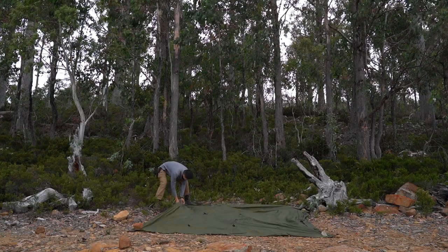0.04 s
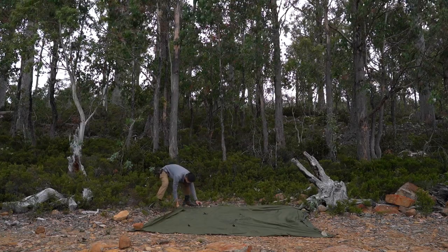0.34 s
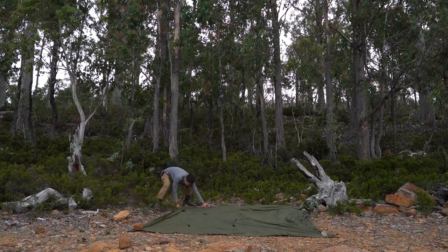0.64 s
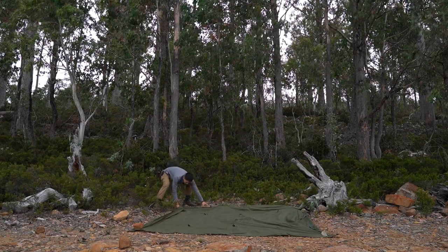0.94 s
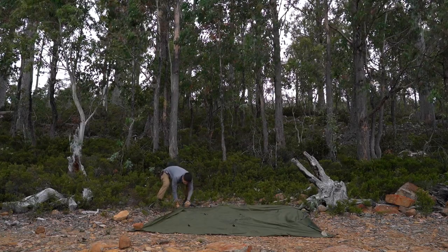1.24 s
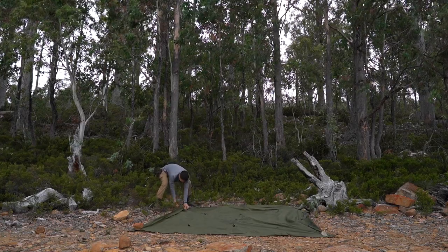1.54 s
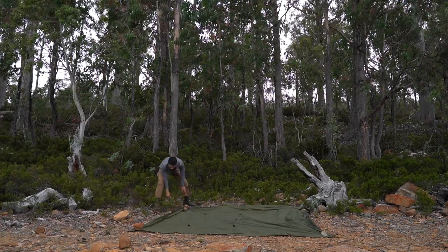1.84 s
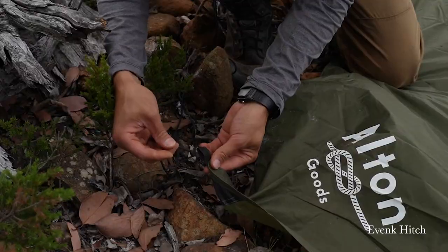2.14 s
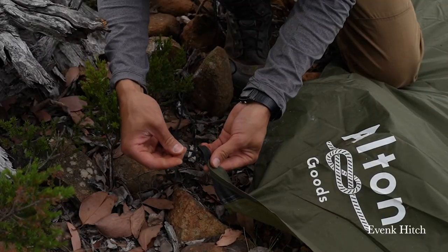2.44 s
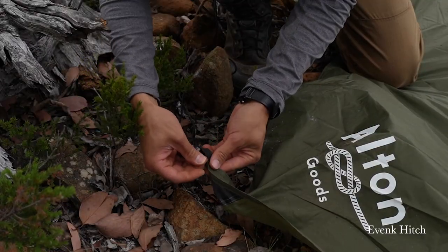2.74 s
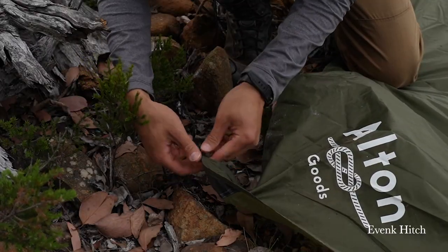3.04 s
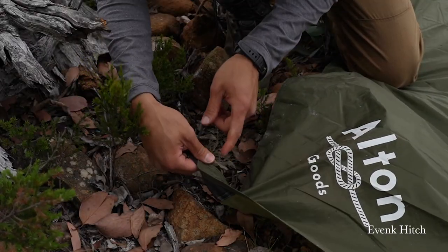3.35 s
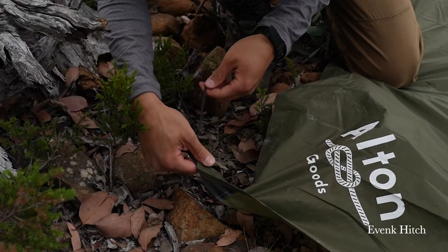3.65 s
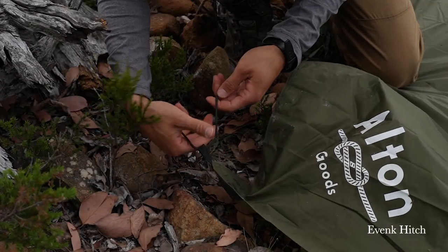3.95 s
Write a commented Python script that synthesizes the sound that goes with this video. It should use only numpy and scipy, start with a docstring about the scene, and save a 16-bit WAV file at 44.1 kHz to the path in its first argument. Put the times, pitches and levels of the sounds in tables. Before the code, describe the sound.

Wind hisses steadily in forest treetops, with low gusts rumbling on the microphone and building towards 2 seconds. There the wind abruptly drops to a softer hiss. Hands fastening a tarp make a few tiny ticks from 2.2 to 2.8 seconds, and a faint hollow drone runs from 2.5 to 3.4. A short fabric swish follows around 3.6 seconds, with a sharper tick and light wind rumble.

```python
"""Forest wind and a tarp

Wind hisses in the crowns of a tall forest while gusts rumble on a mono microphone in a clearing.
The scene cuts to a sheltered spot near the ground, where hands fasten the corner of a tarp:
a few tiny ticks, a soft hollow drone, and a short swish of fabric as one hand lets go."""
import sys
import numpy as np
from scipy import signal
from scipy.fft import rfft, irfft
from scipy.io import wavfile
from scipy.ndimage import uniform_filter1d, map_coordinates

SR = 44100
rng = np.random.default_rng(int(sys.argv[2]) if len(sys.argv) > 2 else 0)


def materialize(psi):
    """Save the field psi as 16-bit PCM at rate SR to the path in sys.argv[1].

    A 1-D psi becomes a single channel; in a 2-D psi each row is a channel.
    """
    bounded = np.clip(np.atleast_2d(psi).T, -1, 1)
    quanta = np.round(bounded * 32767).astype(np.int16)
    wavfile.write(sys.argv[1], SR, quanta)


N = 176400
T = np.arange(N) / SR
BIN_HZ = np.maximum(np.arange(N // 2 + 1) * SR / N, 1)


def undb(db):
    """Amplitude grows tenfold for every 20 dB."""
    return 10 ** (np.asarray(db) / 20)

def unit(x):
    """Normalisation to an rms of 1."""
    return x / np.sqrt(np.mean(x ** 2))

def curve(rows):
    """Linear interpolation between (time [s], value) points."""
    return np.interp(T, *np.array(rows, float).T)

def colour(x, spectrum):
    """Spectral shaping by (frequency [Hz], gain [dB]) points."""
    hz, db = np.array(spectrum, float).T
    gain = undb(np.interp(np.log(BIN_HZ), np.log(hz), db))
    return irfft(rfft(x) * gain, N)

def resonate(x, hz, width):
    """Two equal resonators in cascade give a band with steep sides."""
    b, a = signal.iirpeak(hz, hz / width, fs=SR)
    return signal.lfilter(b, a, signal.lfilter(b, a, x))

def wander(per_s):
    """Smoothed random steps give a slow fluctuation of rms 1."""
    hold = int(SR / per_s)
    steps = np.repeat(rng.standard_normal(N // hold + 2), hold)
    return unit(uniform_filter1d(uniform_filter1d(steps, hold), hold)[:N])

def steady(x, span_s):
    """Division by the running rms holds the level constant over times longer than span_s."""
    span = int(span_s * SR)
    power = uniform_filter1d(uniform_filter1d(x ** 2, span), span)
    return x / np.sqrt(power + 1e-12)


# Leaf noise at each spot (frequency [Hz], relative spectral density [dB])
CLEARING_LEAF_SPECTRUM = [(100, -10), (250, 1), (400, 0), (700, -1), (1100, -1.2), (2300, -5), (4300, -7),
                          (7200, -6.5), (8600, -8), (10600, -17), (13500, -20), (15500, -27)]
SHELTER_LEAF_SPECTRUM = [(60, -1.5), (130, 0), (220, 3.5), (450, -1.5), (1100, -1), (1950, -3),
                         (2800, -7.5), (4500, -8.5), (6800, -7.5), (8600, -9.5), (10700, -20), (13500, -23),
                         (15500, -30)]
# Slow swell of the wind in the crowns (time [s], gain [dB])
BREEZE_SWELL = [(0, 0), (.55, -0.3), (.8, 0.17), (1.25, -0.05), (1.5, -0.6), (2.0, 0.1), (2.4, -0.3),
                (2.8, 0.7), (3.05, .5), (3.3, -0.46), (4, 0.5)]

def leaf_hiss(spectrum, db):
    """Incoherent summation: countless leaves add up to broadband noise that swells with the wind."""
    swell_db = 0.38 * wander(per_s=1.95)  # common to all bands
    flutter_db = 1.07 * wander(per_s=20)
    rest, bands = rng.standard_normal(N), 0
    for hz in SR / 2 ** np.arange(2, 9):  # split off octaves from the top down
        band = irfft(rfft(rest) / (1 + (hz / BIN_HZ) ** 4), N)
        rest = rest - band
        flicker_db = 0.04 * wander(per_s=9.95)
        treble_weight = np.sqrt(hz / SR)
        bands += band * undb(swell_db + flicker_db + flutter_db * treble_weight)
    return unit(colour(bands + rest, spectrum)) * undb(db + curve(BREEZE_SWELL))


# Gust strength at the microphone (time [s], relative level [dB])
CLEARING_GUSTS = [(0, -20), (.05, -27.5), (.09, -22), (.13, -29), (.17, -22), (.22, -26), (.44, -30),
                  (.52, -24), (.66, -27), (.71, -20.5), (.84, -21), (.88, -25.5), (1.25, -25), (1.32, -33),
                  (1.41, -18), (1.48, -21), (1.7, -15.5), (1.75, -21.5), (1.82, -14.5), (1.9, -26),
                  (1.94, -15.5), (2.01, -15)]
SHELTER_GUSTS = [(2.05, -46.5), (2.15, -52.5), (2.24, -40.5), (2.42, -54), (2.9, -52.5), (3.07, -38.5),
                 (3.2, -51), (3.46, -48.5), (3.57, -33), (3.72, -36), (3.83, -34.5), (3.89, -46),
                 (4, -30.5)]
# Eddy rumble in a gust of average strength (frequency [Hz], relative spectral density [dB])
CLEARING_EDDY_SPECTRUM = [(8, -11), (18, -2), (36, -3.5), (66, 1), (98, -2), (128, -11), (195, -16),
                          (290, -27), (480, -43), (1000, -65)]
SHELTER_EDDY_SPECTRUM = [(5, -14), (11, 12), (22, -3), (38, -4), (66, -12), (100, -25), (220, -35),
                         (600, -62)]

def gust_rumble(gusts, spectrum, gain_db):
    """Convected turbulence: a stronger gust sweeps eddies past faster, so the rumble rises in pitch."""
    octaves_per_db = 0.0529
    strength_db = curve(gusts)
    average_db = np.mean(np.array(gusts)[:, 1])
    speed = 2 ** (octaves_per_db * (strength_db - average_db))
    eddies = colour(rng.standard_normal(N), spectrum)
    pressure = map_coordinates(eddies, [np.cumsum(speed)], mode="grid-wrap")
    puffs_db = 1.34 * wander(per_s=24)  # uneven push within a gust
    return steady(pressure, span_s=.025) * undb(strength_db + gain_db + puffs_db)


def snaps(per_s):
    """Shot noise: independent impulses of random sign and size."""
    hits = rng.random(N) < per_s / SR
    signs = rng.choice([-1, 1], N)
    size_db = 4 * np.minimum(rng.exponential(size=N), 4)
    return hits * signs * undb(size_db)

# Strokes of fabric on fabric (peak time [s], power rise constant [s], fall constant [s], level [dB])
FABRIC_STROKES = [(2.8, .1, .1, -50), (3.05, .04, .06, -51), (3.33, .01, .02, -46),
                  (3.625, 0.073, 0.064, -42.5), (3.641, .002, 0.0058, -32.5), (3.654, 0.0061, .006, -32.5),
                  (3.82, 0.0065, 0.012, -44), (3.92, .04, 0.074, -45)]
# Snapping creases (frequency [Hz], relative spectral density [dB])
CREASE_SPECTRUM = [(300, -2.5), (1500, -1), (3500, -1), (5000, -1.5), (7500, 3.5), (10000, -4.5),
                   (11500, -4), (13300, -4), (15500, -11)]

def fabric_swish():
    """Friction noise: dense crease snaps and a crisper crackle follow strokes that add in power."""
    power = 0
    for peak_s, rise_s, fall_s, db in FABRIC_STROKES:
        falloff = np.where(T < peak_s, (peak_s - T) / rise_s, (T - peak_s) / fall_s)
        power += undb(db) ** 2 * np.exp(-falloff)
    crackle = unit(resonate(snaps(per_s=1100), hz=13100, width=3500)) * undb(-9.5)
    creases = unit(colour(snaps(per_s=5500), CREASE_SPECTRUM))
    return (creases + crackle) * np.sqrt(power)


# Contacts of the fastening (time [s], peak level [dB], frequency [Hz], resonator bandwidth [Hz])
FASTENING_CONTACTS = [(2.211, -36.5, 13500, 3000), (2.217, -39.5, 13800, 2400), (2.612, -33, 13200, 2000),
                      (2.705, -38, 13500, 5000), (2.838, -27.5, 9000, 7000), (3.716, -21.5, 5500, 6000),
                      (3.724, -27.5, 5500, 6000)]

def fastening_ticks():
    """Impact excitation: each tiny hard contact drives a broad resonance for a few milliseconds."""
    decay_s = .0015
    ticks, grit = np.zeros(N), rng.standard_normal(N)
    for start_s, db, hz, width in FASTENING_CONTACTS:
        age = np.maximum(T - start_s, 0)
        envelope = (T >= start_s) * np.exp(-age / decay_s) + 1e-12
        tick = resonate(grit * envelope, hz, width)
        ticks += tick / np.abs(tick).max() * undb(db)
    return ticks


# Hollow drone while the corner is pulled taut (time [s], core level [dB])
DRONE_ENVELOPE = [(2.45, -56.5), (2.62, -50), (2.76, -41.5), (2.87, -50), (2.96, -46.5), (3.12, -47),
                  (3.26, -43), (3.42, -63)]
# Its noisy edge (frequency [Hz], relative spectral density [dB])
DRONE_EDGE_SPECTRUM = [(120, -32), (200, -3), (320, 1), (450, -16), (1200, -13), (3000, -34.5)]

def tarp_drone():
    """Random modulation spreads a slowly sinking tone into a narrow, wavering band of noise."""
    start_hz, width_hz, sag_hz_per_s = 236, 22, 28
    centre_hz = start_hz - sag_hz_per_s * (T - DRONE_ENVELOPE[0][0])
    carrier = np.exp(2j * np.pi * np.cumsum(centre_hz) / SR)
    waver = wander(2 * width_hz) + 1j * wander(2 * width_hz)
    core = steady(np.real(waver * carrier), span_s=.05)
    edge = unit(colour(rng.standard_normal(N), DRONE_EDGE_SPECTRUM)) * undb(-2)
    return (core + edge) * undb(curve(DRONE_ENVELOPE))


def scene():
    """Superposition of the sources in the clearing, then in the shelter; the same in both ears."""
    cut_s, crossfade_s = 2.019, .002
    clearing = leaf_hiss(CLEARING_LEAF_SPECTRUM, db=-29)
    clearing += gust_rumble(CLEARING_GUSTS, CLEARING_EDDY_SPECTRUM, gain_db=0.3)
    shelter = leaf_hiss(SHELTER_LEAF_SPECTRUM, db=-36)
    shelter += gust_rumble(SHELTER_GUSTS, SHELTER_EDDY_SPECTRUM, gain_db=3)
    shelter += tarp_drone() + fastening_ticks() + fabric_swish()
    cut = np.clip((T - cut_s) / crossfade_s, 0, 1)
    mono = (1 - cut) * clearing + cut * shelter
    return np.array([mono, mono])

def record(dry):
    """Band limiting: an elliptic low-pass filter cuts the highest treble steeply."""
    cutoff_hz = 15700
    return signal.sosfilt(signal.ellip(10, .1, 80, cutoff_hz, fs=SR, output="sos"), dry)


dry = scene()
out = record(dry)
materialize(out)
```